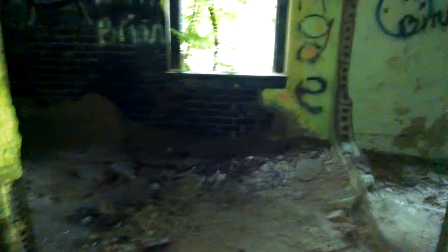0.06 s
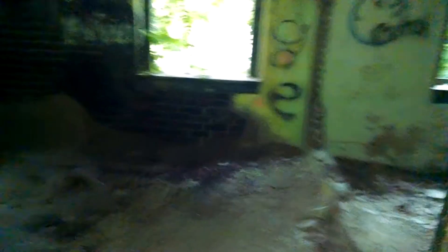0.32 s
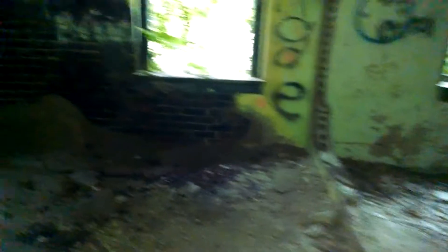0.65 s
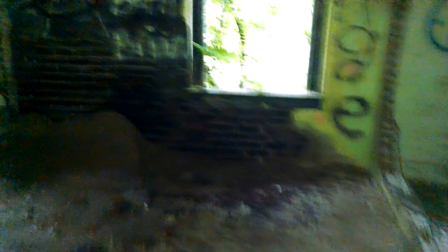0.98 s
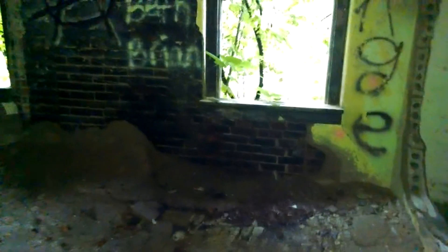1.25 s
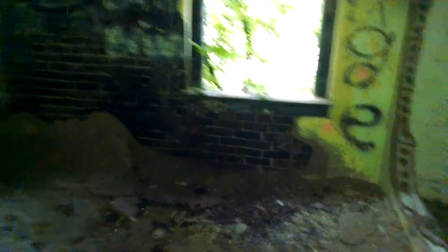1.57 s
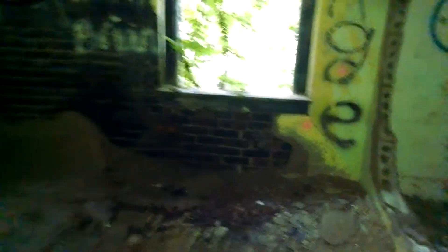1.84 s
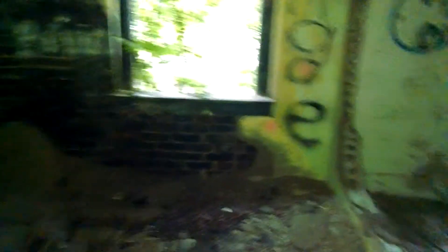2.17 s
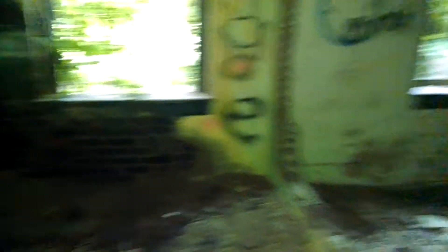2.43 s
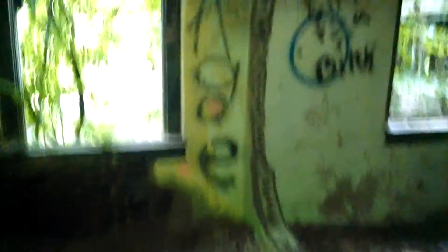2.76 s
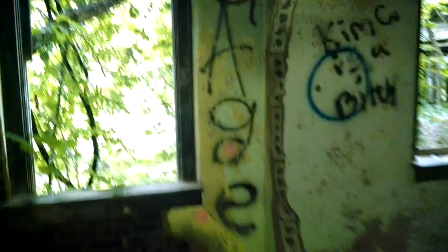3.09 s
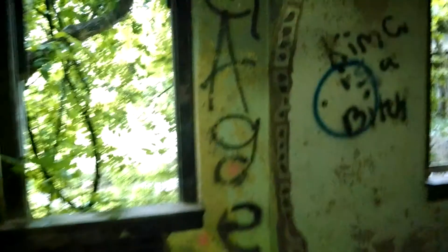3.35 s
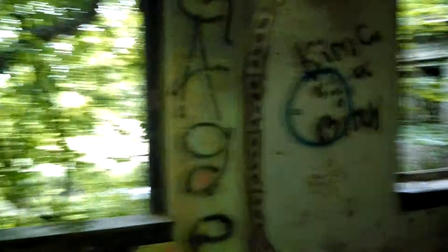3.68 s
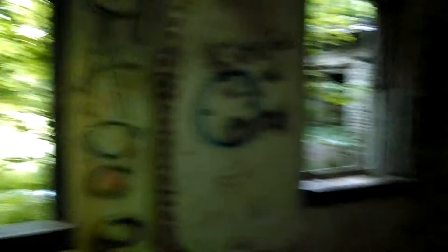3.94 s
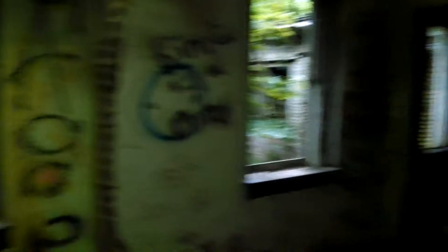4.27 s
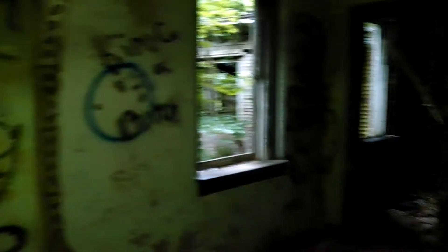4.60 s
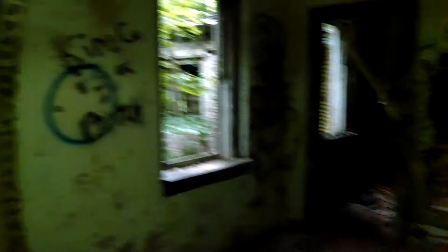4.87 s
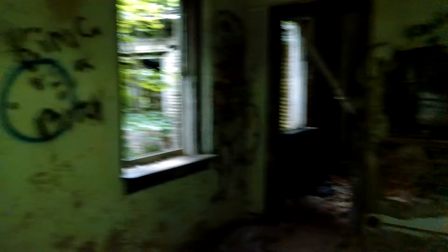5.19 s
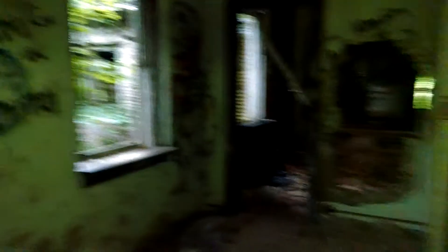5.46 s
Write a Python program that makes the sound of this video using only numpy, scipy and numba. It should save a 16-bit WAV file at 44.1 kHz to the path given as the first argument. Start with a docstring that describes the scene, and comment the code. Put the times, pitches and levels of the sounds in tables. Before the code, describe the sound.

Slow footsteps crunch over grit and plaster rubble on a concrete floor, close to a handheld microphone in a bare room with a short echo. From the start, soles scuff unevenly while sand crackles and small stones crack brightly, slightly to the right. Between about 1.5 and 2.5 seconds plaster lumps grate and loose flakes clink. At 2.9 seconds a heel lands heavily with a dull crunch, followed by a dense run of cracking and grating until about 4 seconds. The steps continue a little lighter, with further sharp cracks around 4.4 and 5 seconds. Near 5.5 seconds more rubble breaks and a hard shard of tile or glass snaps with a loud, short ring. Low handling bumps and rumble come and go throughout, strongest just after 3 seconds. Faint, steady outdoor air drifts in through the open windows.

```python
"""A sole scuffs, close by: slow steps over grit and plaster rubble on a concrete floor, in a bare room.
Grit crunches, stones crack underfoot and crumble, plaster lumps grate and loose flakes clink.
One heel lands heavily midway; at the end a hard shard snaps. Faint air comes in at the open windows.
The microphone is a small stereo camera in the walker's hand. Its body picks up every jolt as a low
bump, and its gain control ducks on the loudest cracks."""
import sys
import numpy as np
from scipy import signal
from scipy.fft import rfft, irfft, next_fast_len
from scipy.io import wavfile
from scipy.ndimage import uniform_filter1d
from numba import njit

SR = 44100
rng = np.random.default_rng(int(sys.argv[2]) if len(sys.argv) > 2 else 0)


def generate_wav(signal):
    """Clip the signal to [-1, 1] and save it as 16-bit WAV at the path in sys.argv[1]."""
    frames = np.transpose(np.atleast_2d(signal))
    scaled = np.clip(frames, -1, 1) * 32767
    pcm = np.round(scaled).astype(np.int16)
    wavfile.write(sys.argv[1], SR, pcm)


N = 252693
TIME = np.arange(N) / SR
FFT_SIZE = next_fast_len(N + SR // 2)
FREQ = np.arange(FFT_SIZE // 2 + 1) * SR / FFT_SIZE


def undb(db):
    """Decibels to gain."""
    return 10 ** (np.asarray(db) / 20)


def unit(x):
    """Scale to rms 1."""
    return x / np.sqrt(np.mean(x ** 2))


def energy(x, db):
    """Scale a short sound to a total energy."""
    return x * undb(db) / np.sqrt(np.sum(x ** 2))


def shape(points):
    """Gain over frequency from (Hz, dB) points."""
    hz, db = np.transpose(points)
    return undb(np.interp(np.log(FREQ + 1), np.log(hz), db))


def filtered(x, response):
    """Apply a frequency response."""
    return irfft(rfft(x, FFT_SIZE) * response, FFT_SIZE)[..., :N]


def ring(x, hz, width):
    """One resonance, gain 1 at its centre."""
    hz = min(hz, .42 * SR)
    return signal.lfilter(*signal.iirpeak(hz, hz / width, fs=SR), x)


def add(track, s, sound):
    """Mix a sound in at time s."""
    i = max(int(s * SR), 0)
    track[i:i + len(sound)] += sound[:N - i]


def flicker(depth, samples, size=N):
    """An uneven gain that wanders over about this many samples."""
    return np.exp(depth * unit(uniform_filter1d(rng.standard_normal(size), size=samples)))


def diffuse(size=N):
    """Noise from all sides at two close capsules: alike in the bass, unrelated in the treble."""
    mid, side = rng.standard_normal((2, size))
    spread = np.minimum(np.fft.rfftfreq(size, 1 / SR) / 2100, 1) ** .5
    side = irfft(rfft(side) * spread, size)
    return unit(np.array([mid + side, mid - side]))


def scatter(spread_db, count):
    """Fragment sizes: many small, a few large."""
    return undb(spread_db * np.minimum(rng.exponential(size=count), 4))


def chips(times_s, sizes, hz, turns, length=192):
    """Fragments that each ring at their own pitch, dying away over about `turns` cycles."""
    n = np.arange(length)
    cycles = np.outer(hz / SR, n)
    decay_cycles = turns * rng.uniform(.3, 1.7, (len(hz), 1))
    rings = np.sin(2 * np.pi * cycles) * np.exp(-cycles / decay_cycles)
    at = (times_s * SR).astype(int)[:, None] + n
    return np.bincount(at.ravel(), (rings * (sizes * np.sqrt(hz))[:, None]).ravel())


def strokes(rows, attack_s, release_s, rest_db):
    """Effort of the feet: each movement builds up, holds and dies away, over a resting level."""
    power = undb(rest_db) ** 2
    for s, hold_s, db in rows:
        fade = np.maximum(s - TIME, 0) / attack_s + np.maximum(TIME - s - hold_s, 0) / release_s
        power = power + (undb(db) * np.exp(-fade)) ** 2
    return np.sqrt(power)


# Slides of a sole or trouser leg. Each row: start in seconds, hold in seconds, level in dB.
SLIDE_STROKES = [(0.0, .125, -36), (0.44, 0.065, -45.5), (0.58, .2, -44.5), (0.9, 0.11, -47),
                 (1.07, .14, -42.5), (1.35, .04, -46), (1.735, .025, -40), (1.87, .2, -45.5),
                 (2.18, 0.11, -41), (2.48, .2, -50.5), (2.76, 0.089, -45.5), (2.897, 0.014, -36),
                 (2.98, 0.18, -38), (3.2, .06, -36.5), (3.3, .27, -44), (3.7, .07, -47.5), (3.83, .08, -42),
                 (3.96, .08, -39), (4.17, .16, -43.5), (4.43, .32, -45), (4.86, 0.54, -40),
                 (5.45, .095, -37.5)]

def sliding():
    """How hard soles and cloth slide; the cloth never quite comes to rest."""
    return strokes(SLIDE_STROKES, attack_s=.016, release_s=.03, rest_db=-54.5)


# Tone of a sliding sole. Each row: frequency in Hz, level in dB.
SCUFF_SPECTRUM = [(150, 13.5), (400, 9), (900, 1), (1900, -1.5), (3200, -11.5), (5000, -9), (12000, -9.5)]

def scuff(slide, level_db=-2):
    """Rubber and cloth slide in uneven catches, just below the microphone."""
    catches = flicker(.25, samples=300)
    return unit(filtered(diffuse(), shape(SCUFF_SPECTRUM)) * catches) * slide * undb(level_db)


# Tone of the air outside. Each row: frequency in Hz, level in dB.
AIR_SPECTRUM = [(30, -45), (150, 17), (400, 6), (1000, -0.5), (2000, -6), (5000, -13), (10000, -9),
                (15000, -12)]

def window_air(level_db=-48.5):
    """Steady outdoor air comes through the open windows and reaches the microphone from all sides."""
    return unit(filtered(diffuse(), shape(AIR_SPECTRUM))) * undb(level_db)


# Jolts of the camera. Each row: start in seconds, level in dB, swing in Hz, then finger rub and
# casing tap in dB relative to the swing.
JOLTS = [(0.021, -28, 119, -5.5, -12), (0.218, -24, 100, -21, -13), (0.312, -25.5, 161, -27, -16),
         (0.794, -24.5, 106, -29, -9), (0.8318, -25, 128, -18, -0.5), (0.877, -25.5, 71, -18, -6),
         (1.11, -25, 158, -24, -2.5), (1.354, -22.5, 142, -27, -15), (1.514, -23, 129, -30, -12),
         (1.523, -17, 189, -32, -6.5), (1.535, -19, 86.6, -34, -27), (1.69, -21.5, 133, -30, -22),
         (1.721, -17, 134, -21, -14), (1.778, -20, 100, -14.5, -12), (1.817, -26, 148, -22, -14),
         (2.277, -23.5, 120, -12, -13), (2.294, -28, 160, -16, -10), (2.311, -23, 90, -23, -20),
         (2.325, -22, 110, -19, -14), (2.42, -29.5, 148, -16, -12), (2.519, -26.5, 142, -27, -20),
         (2.55, -25, 71, -14.5, -25), (2.875, -25, 81, -25, -16), (2.895, -23.5, 93, -16, -9),
         (3.0569, -12.5, 123, -23.5, -9.5), (3.327, -20.5, 118, -21, -11), (3.354, -21, 150, -23, -22),
         (3.399, -22.5, 123, -17, -18), (3.742, -19, 130, -21, -12), (3.871, -27.5, 131, -24, -12),
         (3.984, -25, 140, -25, -11), (4.052, -29, 131, -26, -14), (4.849, -26, 138, -37, -21),
         (5.268, -22, 141, -23, 0), (5.312, -23.5, 144, -20, -5), (5.333, -21.5, 99, -35, -21),
         (5.491, -17.5, 123, -13, -8), (5.527, -19.5, 140, -15, -1.5), (5.546, -21, 128, -24, -3)]
# Tone of the hand's rumble. Each row: frequency in Hz, level in dB.
HAND_SPECTRUM = [(15, 12), (28, 6), (65, 9.5), (120, -2.5), (200, -12), (350, -24), (700, -45),
                 (2000, -37.5)]
# Rise and fall of that rumble. Each row: time in seconds, relative level in dB.
HAND_LEVELS = [(0.0, -45), (0.15, -56), (0.43, -50.5), (0.72, -56), (1.2, -52), (1.55, -58), (2.25, -51),
               (2.65, -56), (2.95, -48), (3.56, -59), (3.85, -53), (4.5, -64), (5.2, -55.5), (5.54, -45.5),
               (5.73, -72)]

def camera_body(swing_cycles=.28, rub_s=.015, tap_s=.00073, rumble_db=15):
    """Right at the microphone: jolts tap and swing the casing, fingers rub on it, the hand rumbles."""
    bumps, t = np.zeros(N), TIME[:8192]
    tap = (t / tap_s) ** 2 * np.exp(2 - 2 * t / tap_s)
    for s, db, hz, rub_db, tap_db in JOLTS:
        cycles = t * hz
        swing = np.sin(2 * np.pi * cycles) * cycles / swing_cycles * np.exp(1 - cycles / swing_cycles)
        friction = ring(rng.standard_normal(len(t)), 2.38 * hz, width=146)
        rub = unit(ring(friction, 2.42 * hz, width=210)) * np.exp(-t / rub_s)
        add(bumps, s, undb(db - .37) * (swing + undb(rub_db + 2) * rub - undb(tap_db) * tap))
    rumble = unit(filtered(rng.standard_normal(N), shape(HAND_SPECTRUM)))
    grip = undb(np.interp(TIME, *np.transpose(HAND_LEVELS)) + rumble_db)
    # the casing shakes mainly the left capsule, and the right in opposite polarity
    return (bumps + rumble * grip) * np.array([[undb(8.5)], [-undb(-7.5)]])


def crunch(weight, spectrum, spread_db, band_hz, count):
    """Particles crushed under the sole in small collapses, more of them as the weight comes on."""
    rate = np.sqrt(unit(weight))
    density = rate * flicker(.8, samples=400)
    times = np.interp(rng.random(count), np.cumsum(density) / np.sum(density), TIME)
    pitches = rng.uniform(*band_hz, count)
    ticks = np.zeros(N)
    add(ticks, 0, chips(times, scatter(spread_db, count), pitches, turns=1.1))
    return unit(filtered(ticks / np.sqrt(rate), shape(spectrum))) * weight


# A foot bears down on the grit. Each row: start in seconds, hold in seconds, level in dB.
FOOT_PRESSES = [(0.19, .05, -45), (0.625, .085, -38.5), (0.96, .03, -47), (1.06, .17, -41),
                (1.55, .06, -45), (1.8, .16, -46), (2.21, .05, -37.5), (2.45, .02, -46), (2.6, .04, -42),
                (2.79, .1, -42.5), (3.0, .28, -39), (3.39, .17, -42), (3.75, .06, -51), (3.89, .05, -39.5),
                (4.25, .03, -46), (4.34, .22, -42), (4.69, .72, -43), (5.51, .07, -35.5)]
# Tones of fine sand and of coarser gravel. Each row: frequency in Hz, level in dB.
SAND_SPECTRUM = [(500, 6), (1500, -99), (3200, -1), (4800, -7.5), (6200, 3.5), (7800, -3.5), (9400, 6),
                 (12000, 1), (15500, 0.5)]
GRAVEL_SPECTRUM = [(1500, -6), (2600, 4), (3300, 11), (4300, -7), (5200, 2), (6300, 2), (9000, 11.5)]

def grit(slide, gravel_db=-53):
    """Fine sand crackles under the walker's weight; gravel scrapes along with the sliding sole."""
    weight = strokes(FOOT_PRESSES, attack_s=.025, release_s=.04, rest_db=-61.5)
    drag = unit(slide ** .91)
    sand = crunch(weight, SAND_SPECTRUM, spread_db=4, band_hz=(4200, 16000), count=2400)
    gravel = crunch(drag, GRAVEL_SPECTRUM, spread_db=2, band_hz=(1600, 8540), count=2600)
    return sand + undb(gravel_db) * gravel


# Tone of the cracks as the microphone hears them: thin bass, two bright peaks.
# Each row: frequency in Hz, gain in dB.
CRACK_TONE = [(600, -69), (2000, -1.5), (4400, -9), (6000, 3.5), (7800, 1.5), (9500, 3.5), (13000, 1),
              (15000, 2)]
# Echoes off the nearest wall and the ceiling. Each row: delay in seconds, relative level in dB.
SLAP_ECHOES = [(0.0065, -16), (0.0161, -19)]
# Stones cracking under a sole. Each row: start in seconds, level in dB, ring in Hz, then offsets
# in dB for the crumbs and for the room's echo.
STONE_CRACKS = [(0.1126, -15, 10700, -8, 3), (0.1282, 2, 9300, -19, -3), (0.1371, -13, 10400, -12, -6),
                (0.1444, -7, 12000, -12, -2), (0.179, -11.5, 7000, 3, -6), (0.194, -17, 11900, 8, 9),
                (0.273, -24, 11800, -6, -2), (0.424, -17.5, 12000, 3, -7), (0.4756, -16.5, 6360, -4, 1.5),
                (0.566, -19, 9300, -6, 9), (0.5735, -13.5, 12800, 7, 6), (0.6191, -4.5, 6260, 3, -0.5),
                (0.6212, -7.5, 9400, -4, -2), (0.6408, -12, 12100, -2, 8), (0.6892, -14.5, 10100, -4, -2),
                (0.7346, 2.5, 8100, -2, -1.5), (0.86, -23, 13100, -8, -3), (0.8673, -18.5, 7650, 8.5, 0),
                (0.954, -13.5, 12100, 2.5, 2), (1.0018, -5.5, 10100, -21, 1.5),
                (1.0172, -13.5, 9500, -8, 3), (1.0367, -16, 12700, -5, 0), (1.0697, -10, 11500, 7, 2),
                (1.1545, -11.5, 9900, -8, 2), (1.187, -6, 9400, -3, -1.5), (1.2095, -15, 10200, -5, 1),
                (1.2297, -11.5, 5500, -6, 2.5), (1.4001, 0, 12500, -21, -6.5), (1.499, -20, 9500, -1, -2),
                (1.52, 0, 8700, -5, -1), (1.5621, -7, 6400, 11.5, 1), (1.579, -15, 7000, -3, -1),
                (1.687, -15, 12100, -13, 1), (1.7362, -1.5, 6300, 3, 0), (1.7473, -7, 6360, -8, -5),
                (1.7658, -9, 12500, -6, 1), (1.7833, -8, 8500, -4, 1), (1.8181, -5, 5570, -8, 1.5),
                (1.8756, -2, 9100, -5, 2.5), (1.8783, -2.5, 6460, -10, -6), (2.0864, -13, 8800, -3, 4),
                (2.134, -15, 8040, 3, 2), (2.1625, -17, 12100, -6, -6), (2.1948, -5, 9400, 3, 0),
                (2.2167, -9, 9900, -4, -1), (2.2398, -7, 8100, -6, -4), (2.2562, -10, 6600, -6, -1),
                (2.3307, 2.5, 6770, -20, -6), (2.389, -10, 8100, 2, 2.5), (2.4052, -14, 9500, -6, 7),
                (2.4412, -15, 12100, -5, 1), (2.5013, -9.5, 5560, -3, -2), (2.5544, -7, 6600, -3, 1.5),
                (2.59, -11.5, 8400, -2, 0), (2.5929, -12, 12100, -3, 2), (2.6105, -19, 6900, -6, -5),
                (2.6531, -19, 12900, -6, 0), (2.67, -14.5, 6260, -6, -2), (2.778, -11.5, 6560, 6, -4),
                (2.7847, -20, 8400, -4, -3), (2.7961, -12.5, 8900, -7, 3), (2.8279, -16, 14600, -6, -1),
                (2.8999, 0, 6250, 4.5, 0.5), (2.979, -12, 6500, -6, 9), (2.9906, -0.5, 6100, -2, -0.5),
                (3.0177, -3, 6960, -5, -7), (3.066, -1.5, 6360, 2, 1), (3.0974, -10, 14200, -5, 0),
                (3.1135, -6, 13000, -8, -3), (3.1923, -5, 9200, 0, 6.5), (3.1985, -13, 9000, -3, -8),
                (3.3139, -15, 13350, -8, 0), (3.3381, 0, 14500, 6, -0.5), (3.3419, -0.5, 6860, -10, -7),
                (3.3876, 0.5, 12400, 3.5, -4), (3.3933, -8, 11400, -10, -1), (3.4056, -7, 10800, -9, 0),
                (3.4706, 0, 7700, 2, -3), (3.477, -3.5, 11800, 10.5, 0), (3.533, -11, 8450, 5.5, 3.5),
                (3.7528, -23, 13950, -8, -2), (3.8306, -6, 8200, 9.5, 2.5), (3.8657, -17.5, 6800, 3, 3),
                (3.9065, -16.5, 8440, 2, 4), (3.9246, 0, 9400, -10, 2), (4.1416, -14.5, 5900, -5, 0),
                (4.1982, -13, 6470, -15, -4), (4.2403, -28, 9500, -5, 1), (4.2584, -17.5, 12000, 5, 2),
                (4.2925, -17, 7600, 0, 6), (4.312, -7, 12400, 8.5, 2), (4.376, -7.5, 7740, -20, 0),
                (4.4325, -5, 8550, -3, 1), (4.4863, -18, 9600, -9, -2), (4.498, -9, 9600, 5, 2),
                (4.5155, -12, 6500, -3, 1), (4.5975, -18.5, 6030, 3, 7), (4.622, -16.5, 9300, -2, 5),
                (4.694, -13.5, 13000, -2, 2), (4.7184, -16, 6700, 15.5, -2), (4.7307, -12, 9300, 7, 2),
                (4.801, -19, 6360, 11, 7), (4.8811, -8.5, 8600, 3, 2), (4.9457, 0.5, 9300, 2, 2.5),
                (5.0116, -1.5, 9500, -12, -1.5), (5.017, -10, 10200, -8, 3), (5.028, -12, 10900, -6, -3),
                (5.0393, -12, 9500, -8, -5), (5.108, -14.5, 9100, 7, -2), (5.226, -16, 9800, 9, 7),
                (5.249, -13.5, 13500, 6, 5), (5.3015, -3.5, 9800, -3, 1.5), (5.3077, -15, 9500, -8, -7),
                (5.318, -10, 12100, -6, -5), (5.3628, -16, 7200, -8, -4), (5.3812, -10.5, 3260, 11, 3.5),
                (5.4755, -2, 9000, 3, 4), (5.4924, -10, 11700, -4, 7), (5.5015, -6, 9600, -3, 6),
                (5.505, 2, 2570, -4, 5.5), (5.5702, -3, 5900, -9, -16)]

def cracks(snap_s=.00024, crumb_delay_s=.018, chip_turns=3.2):
    """Each stone snaps, splinters and sheds crumbs; gives the direct sound and what reaches the walls."""
    direct, to_walls, t = np.zeros(N), np.zeros(N), TIME[:512]
    for s, db, hz, crumbs_db, echo_db in STONE_CRACKS:
        fracture = rng.standard_normal(len(t)) * np.exp(-t / snap_s)
        tone = energy(ring(fracture, hz, width=1500), db=0)
        bite = energy(ring(fracture, 4300 * rng.uniform(.8, 1.2), width=500), db=-14)
        # big, low-pitched pieces break with a blunter edge
        edge = min(hz / 6000, 1) ** 2 * energy(ring(fracture, 9700, width=12600), db=0)
        splinters = chips(.0014 * rng.random(6), scatter(2.5, 6), rng.uniform(5340, 15200, 6), chip_turns)
        delays = crumb_delay_s * rng.exponential(size=14)
        sizes = scatter(4, 14) * np.exp(-delays / .03)
        crumbs = chips(delays, sizes, rng.uniform(4500, 14900, 14), chip_turns)
        for delay_s, slap_db in SLAP_ECHOES:
            add(direct, s + delay_s * (1 + .14 * rng.uniform(-1, 1)), energy(tone + edge, db + slap_db))
        # the walls gather the snap from every side, so its echo is less coloured
        for track, level_db, edge_db in (direct, db, -3), (to_walls, db + echo_db, 4):
            add(track, s, energy(tone + bite + undb(edge_db) * edge, level_db + 2))
            add(track, s, energy(splinters, level_db - 7))
            add(track, s, energy(crumbs, level_db + crumbs_db - 7))
    return filtered(np.array([direct, to_walls]), shape(CRACK_TONE))


def knocks(level_db=-17.5, contact_s=.00068):
    """Each breaking stone also knocks dully on the concrete."""
    out = np.zeros(N)
    knock = ring(np.exp(-TIME[:512] / contact_s), hz=1000, width=1300)
    for s, db, *_ in STONE_CRACKS:
        add(out, s, energy(knock, db + level_db))
    return out


# Larger lumps of plaster. Each row: start in seconds, grating level in dB, pitch in Hz, snap level in dB.
PLASTER_LUMPS = [(0.1285, -13.5, 3700, -17), (0.6192, -14, 2550, -18), (1.147, -19, 1360, -30),
                 (1.4001, -19, 3600, -16), (1.52, -7, 3580, -11), (1.562, -8.5, 3730, -22),
                 (1.7364, -12, 3760, -14), (2.1949, -20.5, 1910, -20), (2.3309, -13.5, 3860, -18),
                 (2.5013, -14.5, 2800, -16), (2.519, -20, 3170, -30), (2.894, -12, 1250, -24),
                 (2.9909, -14.5, 4030, -30), (3.018, -11, 4600, -24), (3.064, -6.5, 3100, -20),
                 (3.113, -19, 4500, -26), (3.192, -19, 3770, -24), (3.235, -15.5, 2980, -30),
                 (3.3382, -13.5, 3970, -15), (3.47, -12, 2230, -13.5), (3.83, -8, 2620, -14),
                 (3.9245, -7, 2330, -13), (4.1417, -23, 1790, -28), (4.312, -15, 2670, -17),
                 (4.359, -16, 2580, -28), (4.4328, -14.5, 4050, -10), (4.879, -13.5, 2920, -24),
                 (4.9457, -13, 4120, -24), (5.0116, -17.5, 3520, -21), (5.105, -21, 2720, -28),
                 (5.38, -14, 3420, -26), (5.4753, -15.5, 1700, -15), (5.505, -3.5, 2550, -16)]

def lumps(snap_s=.00021, run_s=.08, decay_s=.04, count=24):
    """A lump gives with one dry snap, then grates on the concrete in a dying run of dull ticks."""
    snaps, grating, t = np.zeros(N), np.zeros(N), TIME[:256]
    for s, grating_db, hz, snap_db in PLASTER_LUMPS:
        fracture = rng.standard_normal(len(t)) * np.exp(-t / snap_s)
        add(snaps, s, energy(ring(fracture, hz, width=3500), snap_db - 1))
        delays = run_s * np.linspace(0, 1, count) ** 2 * rng.uniform(.7, 1.3, count)
        pitches = hz * np.exp(.2 * rng.standard_normal(count))
        sizes = scatter(2.6, count) * np.exp(-delays / decay_s)
        add(grating, s, energy(chips(delays, sizes, pitches, turns=4), grating_db - 2.5))
    return snaps, grating


# Flakes of plaster and tile. Each row: start in seconds, length in seconds, level in dB, pitch in Hz.
DRAGGED_FLAKES = [(0.643, 0.071, -21, 3480), (1.76, .13, -11, 3710), (2.2, 0.084, -19, 3950),
                  (3.13, 0.19, -18, 3510), (4.801, .03, -18.5, 4050)]

def clinks(level_db=-4, count=18):
    """Loose flakes knock together as a sole drags them, each with its own short ring."""
    out = np.zeros(N)
    for s, length_s, db, hz in DRAGGED_FLAKES:
        pitches = hz * np.exp(.2 * rng.standard_normal(count))
        flakes = chips(length_s * rng.random(count), scatter(1.8, count), pitches, turns=9, length=640)
        add(out, s, energy(flakes, db + level_db))
    return out


# Tone of plaster under the heel. Each row: frequency in Hz, level in dB.
HEEL_SPECTRUM = [(200, -1), (500, 6), (900, -12), (1800, 1), (2600, -20), (6000, -12)]

def heel(start_s=2.892, db=-5, mean_delay_s=.011, count=60):
    """The heaviest step lands on plaster and crushes it in a short, dull crunch."""
    out = np.zeros(N)
    delays = mean_delay_s * rng.gamma(2, .5, count)
    add(out, start_s, chips(delays, scatter(2, count), rng.uniform(400, 3000, count), turns=.6))
    return energy(filtered(out, shape(HEEL_SPECTRUM)), db)


# Resonances of the shard. Each row: frequency in Hz, width in Hz, relative level in dB.
SHARD_RING = [(1400, 850, 5.5), (4640, 900, -3), (6130, 810, 13), (8900, 500, 5.5), (14100, 2000, -8)]

def shard(start_s=5.5526, db=14, snap_s=.00006):
    """A hard flake of tile or glass snaps with a loud, short ring."""
    out = np.zeros(N)
    push = np.exp(-TIME[:1024] / snap_s)
    modes = sum(undb(mode_db) * hz * ring(push, hz, width) / width for hz, width, mode_db in SHARD_RING)
    add(out, start_s, energy(ring(modes, 6200, width=5300), db))
    return out


def room(direct, to_walls, wet_db, left_db, t60_s=.24, build_s=.0023, positions=14):
    """Direct sound and the short tail of bare walls; echoes bunch and change as the walker moves."""
    out, t, hop = np.zeros((2, 2 * N)), TIME[:16384], N // positions + 1
    out[:, :N] = undb(left_db) * direct, direct
    envelope = undb(-60 * t / t60_s) * np.clip(t / build_s, 0, 1)
    for i in range(0, N, hop):
        bunches = flicker(.4, samples=160, size=len(t))
        tail = energy(diffuse(len(t)) * bunches * envelope, wet_db)
        echoes = signal.fftconvolve(to_walls[None, i:i + hop], tail, axes=1)
        out[:, i:i + echoes.shape[1]] += echoes
    return out[:, :N]


def scene():
    """The floor heard from hand height, stones and grit to the right, with window air and camera bumps."""
    slide = sliding()
    stones, stones_to_walls = cracks()
    lump_snaps, grating = lumps()
    underfoot = grit(slide)
    rubble = grating + clinks()
    shard_snap, heel_crunch = shard(), heel()
    steps = room(stones + knocks() + underfoot, stones_to_walls + underfoot, wet_db=-1, left_db=-25)
    plaster = room(rubble + lump_snaps, rubble, wet_db=5, left_db=-2)
    snap = room(shard_snap, ring(shard_snap, 4400, width=2900), wet_db=1, left_db=-.5, t60_s=.27)
    landing = room(heel_crunch, heel_crunch, wet_db=-3, left_db=-8)
    return steps + plaster + snap + landing + window_air() + camera_body() + scuff(slide)


@njit
def follow(x, attack, release):
    """Level follower with separate rates for rising and falling."""
    out, level = np.empty(len(x)), 0.
    for i in range(len(x)):
        level += (x[i] - level) * (attack if x[i] > level else release)
        out[i] = level
    return out


def gain_control(x, threshold_db=-23, share=.35, attack_s=.0016, release_s=.18):
    """The camera takes off a share of any level over the threshold: loud cracks duck everything."""
    level = follow(np.abs(x).max(axis=0), 1 / (attack_s * SR), 1 / (release_s * SR))
    return x / np.maximum(level / undb(threshold_db), 1) ** share


# The left microphone port is shaded in the treble. Each row: frequency in Hz, gain in dB.
LEFT_SHADING = [(1500, 0), (3200, 0), (4600, -1), (8000, -10), (15000, -13)]
# Share of each capsule taken from the other to widen the image. Each row: frequency in Hz, gain in dB.
WIDENING = [(300, -5), (2700, -2.5), (5000, -7), (8000, -14.5), (15000, -18.5)]

def record(dry, cross_delay_s=.000366, top_hz=15800):
    """The camera's two capsules, each minus the other's delayed sound, then ducked, clipped and top-cut."""
    ports = np.array([filtered(dry[0], shape(LEFT_SHADING)), dry[1]])
    delay = np.exp(-2j * np.pi * FREQ * cross_delay_s)
    wide = ports - filtered(ports[::-1], shape(WIDENING) * delay)
    clipped = np.clip(gain_control(wide), -1, 1)
    return signal.sosfilt(signal.ellip(10, .2, 90, top_hz, fs=SR, output="sos"), clipped)


dry = scene()
out = record(dry)
generate_wav(out)
```